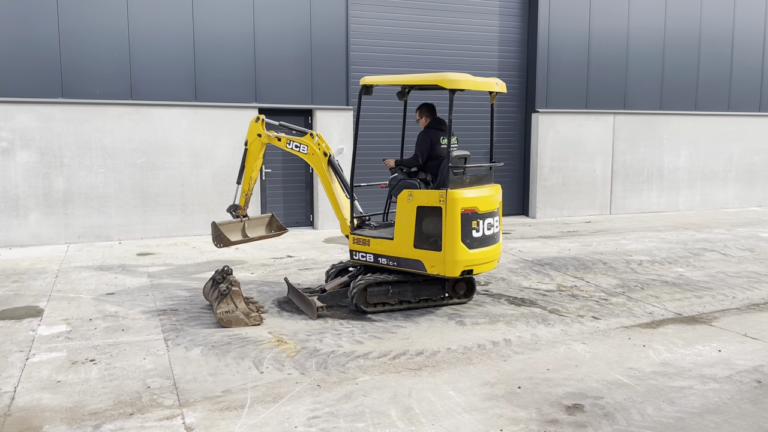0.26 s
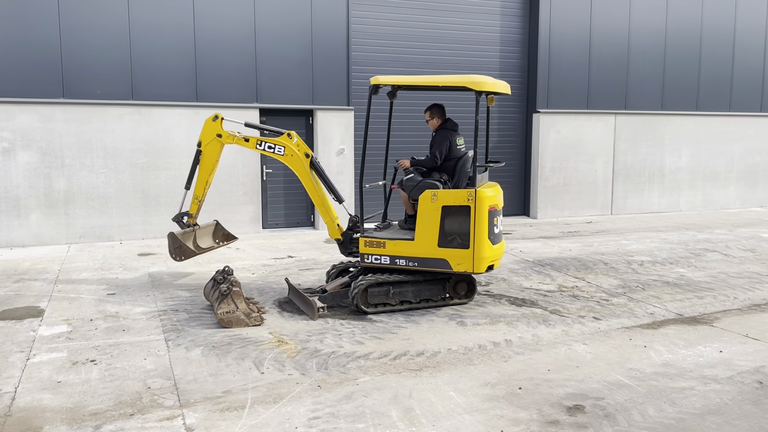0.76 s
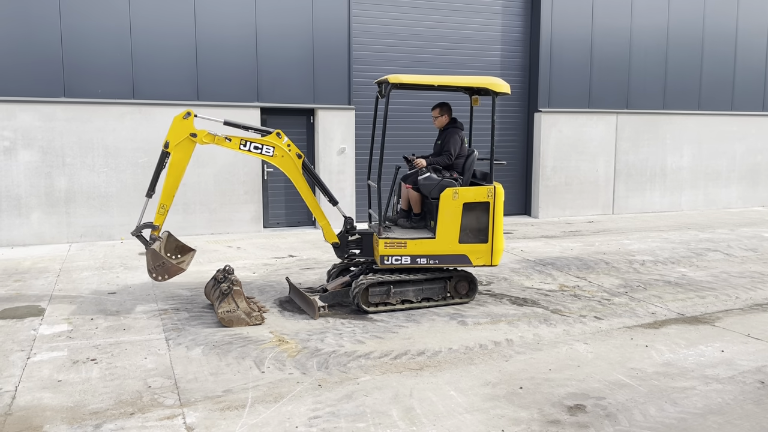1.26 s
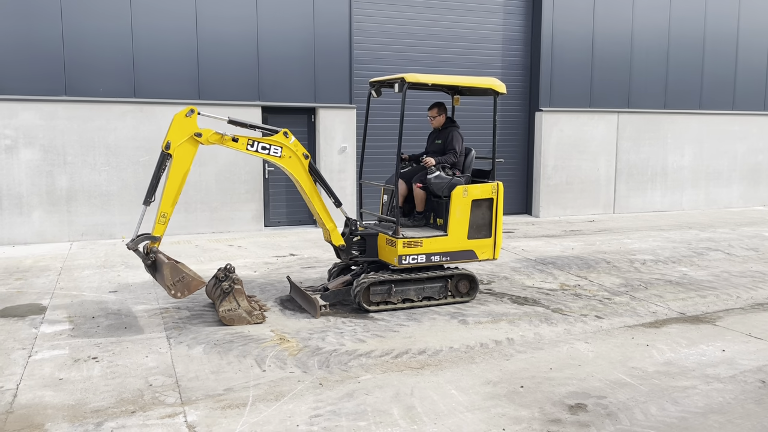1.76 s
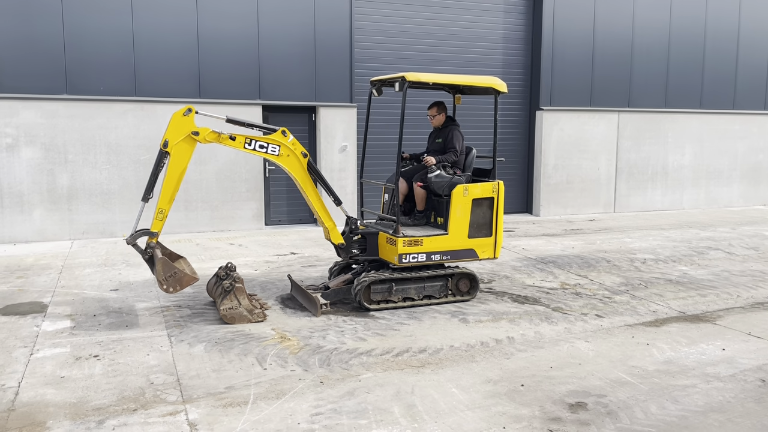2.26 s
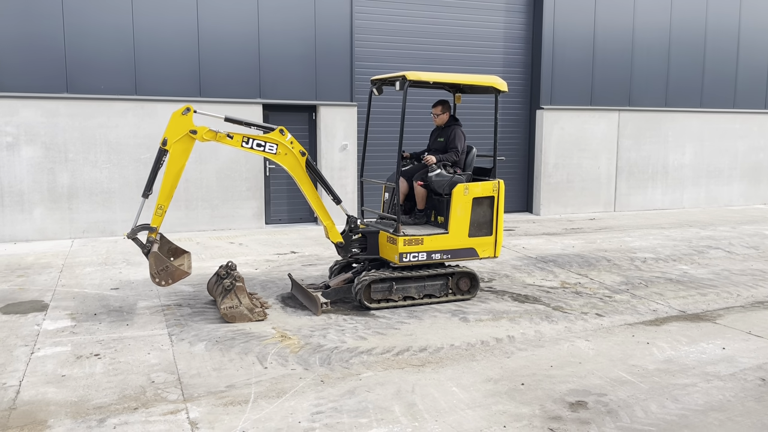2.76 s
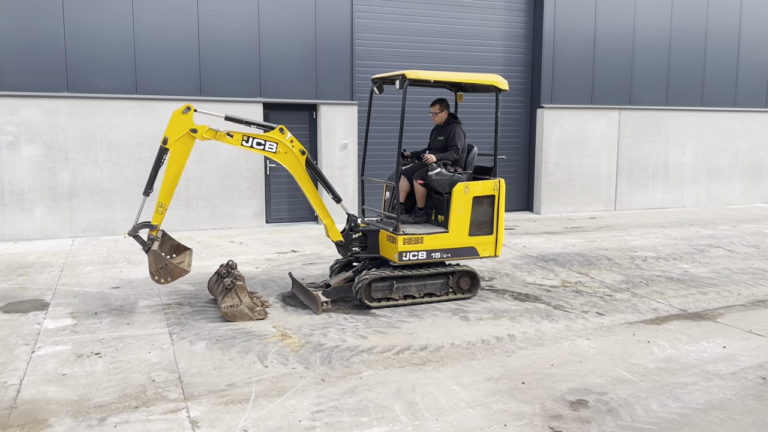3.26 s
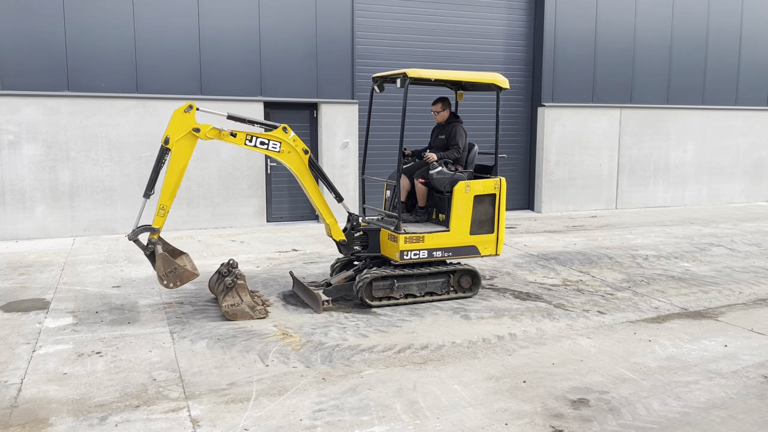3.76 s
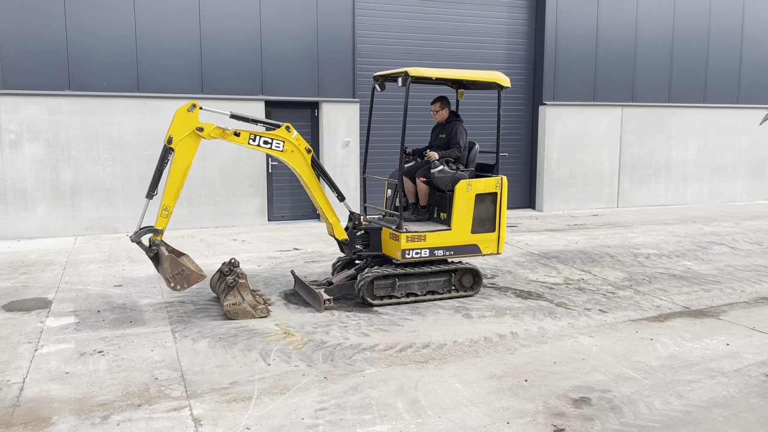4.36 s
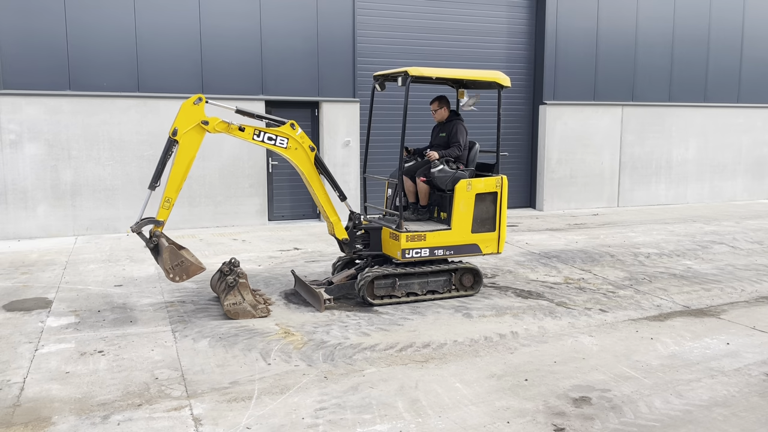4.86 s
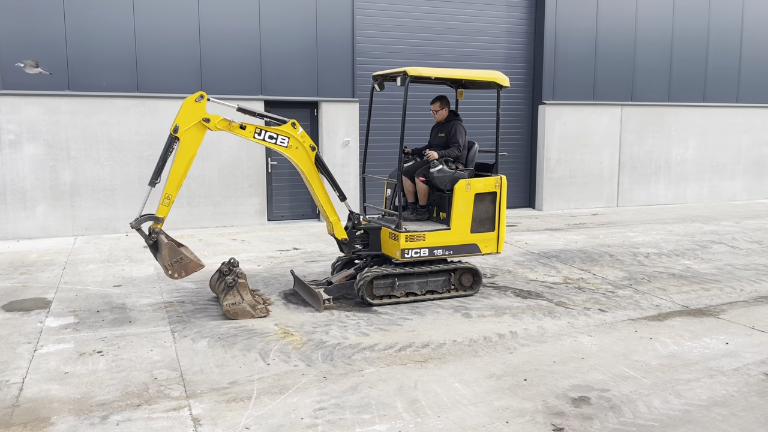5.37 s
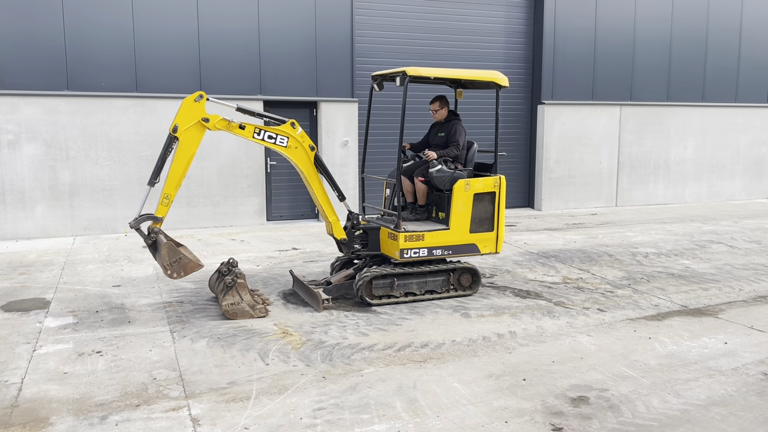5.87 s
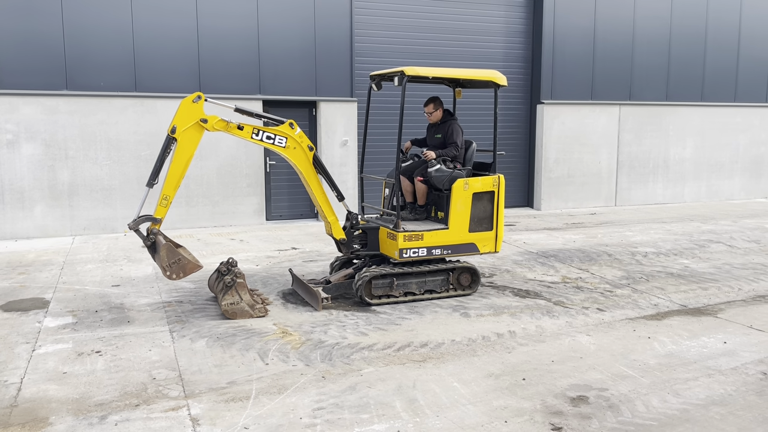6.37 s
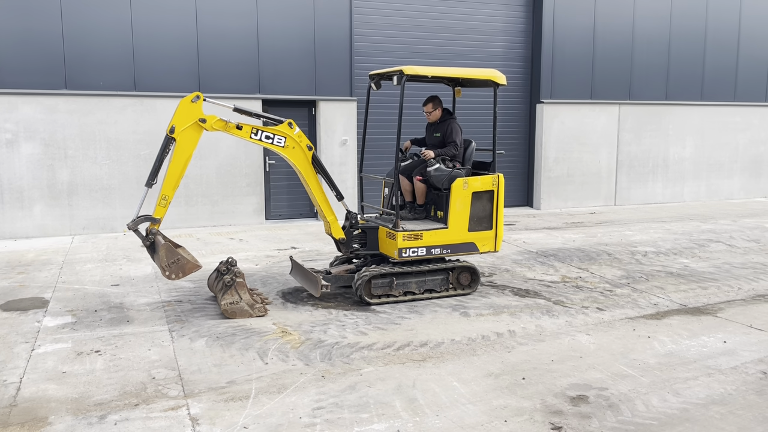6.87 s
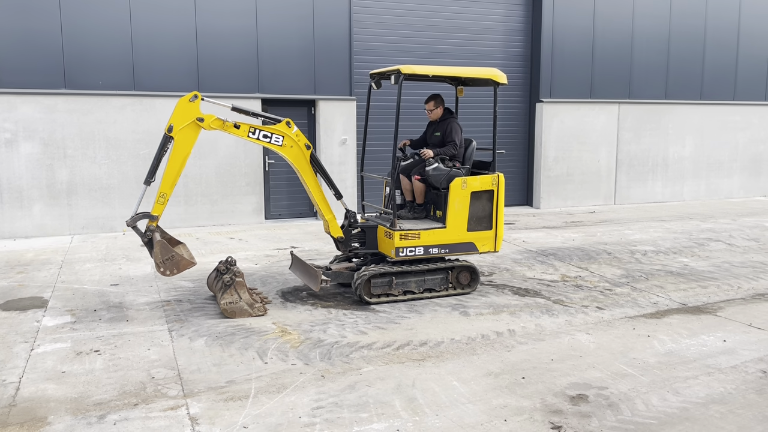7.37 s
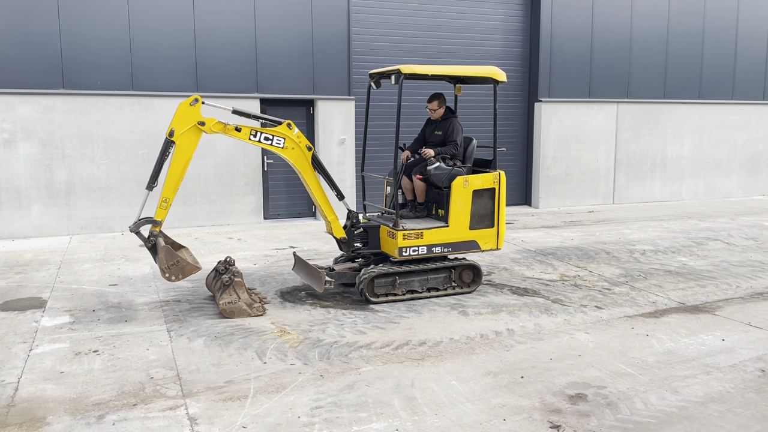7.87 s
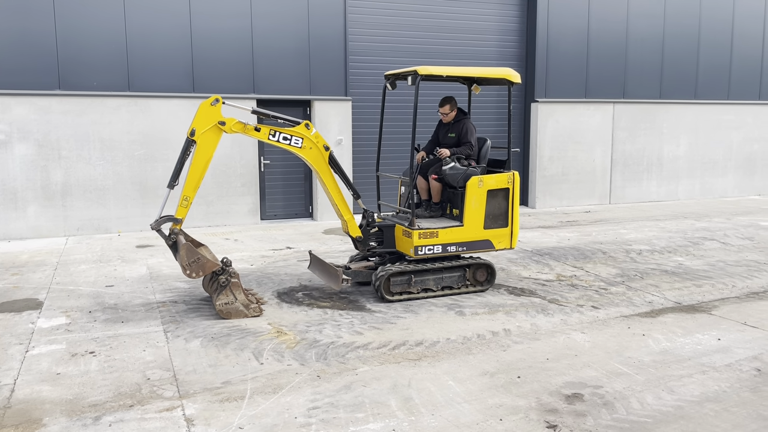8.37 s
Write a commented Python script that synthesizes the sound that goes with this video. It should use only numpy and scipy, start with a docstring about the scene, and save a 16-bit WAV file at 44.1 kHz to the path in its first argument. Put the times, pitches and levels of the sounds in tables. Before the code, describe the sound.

A mini digger runs steadily, dipping under whining hydraulic load, with two sharp clanks and then its blade clattering and scraping over concrete.

```python
"""A concrete yard with a wall behind; two microphone ports a little apart hear a small excavator side-on.
Its three-cylinder diesel booms, knocks and ticks. Each lever movement loads the hydraulic pump: the engine
sags, the pump whines and oil hisses through the valves. Gears grind at first as the cab slews. Pins and
blade clank now and then, echoing off the wall, and at the end the blade scrapes over the concrete."""
import sys
import numpy as np
from scipy import signal
from scipy.fft import rfft, irfft, next_fast_len
from scipy.io import wavfile
from scipy.ndimage import map_coordinates

SR = 44100
rng = np.random.default_rng(int(sys.argv[2]) if len(sys.argv) > 2 else 0)


def put_to_file(sound):
    """Save the sound as 16-bit audio at rate SR, in the file named by the first command-line argument."""
    columns = np.atleast_2d(sound).T  # one column per channel
    safe = np.clip(columns, -1, 1)
    whole_steps = np.round(safe * 32767)
    wavfile.write(sys.argv[1], SR, whole_steps.astype(np.int16))


N = 379701
FREE_HZ = 64.02  # firing rate without load


def amp(db):
    """Gain of a level in dB."""
    return 10 ** (np.asarray(db) / 20)


def unit(x):
    """x at rms 1."""
    return x / np.sqrt(np.mean(x ** 2) + 1e-20)


def along(points, hz):
    """Interpolate (f/Hz, value) points on a log frequency axis."""
    f, v = np.transpose(points)
    return np.interp(np.log(hz + 1), np.log(f + 1), v)


def curves(rows):
    """One value per sample for each column after the time."""
    s, *cols = np.transpose(rows)
    return [np.interp(np.arange(N) / SR, s, c) for c in cols]


def wobble(rate):
    """A smooth random curve, rate knots a second."""
    coarse = np.arange(0, N + 64, 64)
    knots = rng.standard_normal(int(N * rate / SR) + 4)
    return np.interp(np.arange(N), coarse, map_coordinates(knots, [coarse * rate / SR]))


def filtered(x, response):
    """x through a complex frequency response."""
    m = next_fast_len(N + SR // 2)
    return irfft(rfft(x, m) * response(np.fft.rfftfreq(m, 1 / SR)), m)[..., :N]


def humps(modes, hz):
    """Summed bell-shaped resonances."""
    return sum(level / (1 + ((hz - centre) / (width / 2)) ** 2) for centre, width, level in modes)


def peaks(modes, hz):
    """Gain of resonances given in dB."""
    return humps([(centre, width, amp(db)) for centre, width, db in modes], hz)


def exhaust(firings, facing_db, sag_hz):
    """The pipe booms at the firing rate; its overtones waver and change with load and direction."""
    # the boom, its octave without load and its double octave (t/s, level/dB)
    boom = [(0.0, -25), (0.04, -19.5), (0.14, -30), (0.21, -53), (0.26, -39), (0.33, -30.5), (0.76, -19.5),
            (1.2, -29), (1.6, -19), (1.92, -21.5), (2.06, -20.5), (2.18, -26.5), (2.35, -23), (3.43, -19.5),
            (3.88, -26), (4.24, -19), (4.84, -21.5), (5.2, -18), (5.39, -22), (5.66, -16), (5.85, -20),
            (6.14, -16.5), (6.38, -21.5), (6.47, -30), (6.66, -20), (7.31, -21.5), (7.41, -17), (7.79, -20),
            (7.89, -36), (7.94, -26), (8.01, -21), (8.44, -25), (8.56, -21.5), (8.61, -21)]
    octave = [(0, -34), (.07, -17), (.33, -19), (.69, -19.5), (.78, -25), (.88, -40), (1.5, -37.5),
              (2.2, -33), (3.3, -33), (8.61, -33)]
    fourth = [(0, -38), (.12, -29.5), (.5, -32), (1.1, -32.5), (1.3, -35), (2.25, -34.5), (2.42, -30.5),
              (3.0, -33), (3.3, -31), (3.95, -31), (4.1, -36), (4.25, -31.5), (4.75, -32), (4.9, -34.5),
              (6.4, -34), (6.7, -30.5), (8.61, -31)]
    # exhaust and fan lines, one list each: multiple of the firing rate, level/dB,
    # dB per dB of facing, dB per Hz of sag, phase drift/rad
    multiples = [5 / 2, 8 / 3, 3, 10 / 3, 11 / 3, 5, 16 / 3, 6, 19 / 3, 7, 8, 28 / 3, 11, 35 / 3, 37 / 3,
                 13, 41 / 3, 43 / 3]
    levels = [-51, -43, -39, -37.5, -44, -47, -47, -42, -51, -58, -46, -53, -51, -48, -53, -54, -64, -52]
    lifts = [-0.5, -2, -0.15, -1.25, -1.3, 0.23, -2, 1.7, 0, 2, 1.2, -1, -1, -0.2, 0.5, -3, 1.5, -3]
    loads = [3.5, 0, .1, 0.66, 1.5, 3.5, -1, -0.5, -0.3, 2.5, -1.5, -1, 1, -2, -2.5, -2.5, -.2, -4]
    drifts = [.3, .5, .6, .8, .5, .3, .3, .25, .3, .3, .3, .4, .4, .3, .4, .4, .4, .4]
    phase = 2 * np.pi * firings
    octave_db = curves(octave)[0] - 2.5 * sag_hz + 1.2 * wobble(8)
    tones = amp(curves(boom)[0]) * np.sin(phase) + amp(octave_db) * np.sin(2 * phase)
    tones += amp(curves(fourth)[0] - 1.5 + 1.5 * wobble(9)) * np.sin(4 * phase + .5 * wobble(8))
    for k, db, lift, load, drift in zip(multiples, levels, lifts, loads, drifts):
        gain = amp(db + lift * facing_db + load * sag_hz + 2 * wobble(5))
        tones += gain * np.sin(k * phase + drift * wobble(6) + 2 * np.pi * rng.random())
    return np.sqrt(2) * tones


def chug(firings):
    """Every firing sends an uneven puff into the resonances of the silencer."""
    # silencer resonances (f/Hz, width/Hz, level/dB)
    silencer = [(206, 34, 0), (258, 18, -9), (385, 30, -12)]
    # strength of the puffs (t/s, level/dB)
    throb = [(0, -35), (.9, -38), (1.3, -30), (1.45, -27.5), (2.1, -29), (2.9, -32), (3.9, -29),
             (4.05, -24), (4.15, -31.5), (5.3, -26), (5.5, -30.5), (6.3, -30), (7.2, -32), (7.65, -28.5),
             (7.74, -24), (7.85, -30.5), (8.61, -29)]
    at = np.flatnonzero(np.diff(np.floor(firings)))
    puffs = np.zeros(N)
    puffs[at] = np.resize([1.2, .1, -.5], len(at))  # each cylinder's steady push
    puffs[at] += rng.standard_normal(len(at))

    def response(hz):
        ring = sum((-1) ** k * amp(db) * 1j * hz * width / (centre ** 2 - hz ** 2 + 1j * hz * width)
                   for k, (centre, width, db) in enumerate(silencer))
        return ring ** 2 / (1 + (150 / (hz + 1)) ** 6)
    return amp(curves(throb)[0] - 2.5) * unit(filtered(puffs, response))


def block(firings, facing_db):
    """Engine noise through the covers; above the bass it knocks, one cylinder harder than the others."""
    # spectrum of block and fan (f/Hz, level/dB)
    spectrum = [(25, -33), (42, -8.5), (80, -6.5), (110, -5), (200, -4), (440, -13.5), (700, -15.5),
                (1040, -16), (1480, -24), (2400, -28), (4000, -31), (6000, -35.5), (8000, -29),
                (10000, -42.5), (15500, -64)]
    # cover resonances (f/Hz, width/Hz, boost/dB)
    panels = [(164, 19, 0), (228, 30, -2), (649, 95, 6.5), (930, 70, 1), (1970, 120, 4), (2270, 17, 8.5),
              (4480, 1040, 3.5)]
    colour = lambda hz: amp(along(spectrum, hz) + humps(panels, hz))
    stroke = np.floor(firings).astype(int)
    force = amp(np.array([.8, 1.5, -1.5])[stroke % 3] + 1.54 * rng.standard_normal(stroke[-1] + 1)[stroke])
    knocks = unit(force * (2 + np.exp(-(firings % 1) / .11)))
    knock_share = lambda hz: .5 / (1 + (1300 / (hz + 1)) ** 2)
    smooth, rough = rng.standard_normal((2, 2, N))
    noise = filtered(smooth, lambda hz: colour(hz) * np.sqrt(1 - knock_share(hz)))
    noise *= amp(-.3 * facing_db)  # the fan grille turns away as the pipe turns towards us
    noise += filtered(rough * knocks, lambda hz: colour(hz) * np.sqrt(knock_share(hz)))
    return amp(-28 + .32 * facing_db) * unit(noise)


def tappet(firings, facing_db, ring_width_hz=65):
    """One valve ticks once in every engine cycle of three firings and keeps the covers ringing."""
    # valve gear resonances (f/Hz, width/Hz, level/dB)
    modes = [(1715, 81, -2.5), (2044, 230, -0.5), (2730, 165, -4.5), (4300, 230, -5)]
    # two cover rings that shift as the machine works (t/s, low f/Hz, level/dB, high f/Hz, level/dB)
    rings = [(0, 1730, -60, 2024, -49), (1.1, 1746, -55, 2004, -49), (1.4, 1755, -46, 2010, -47),
             (1.5, 1750, -55, 2000, -64), (1.55, 1750, -54, 2140, -66), (1.65, 1750, -60, 2146, -49),
             (2.3, 1735, -48, 2130, -48), (2.8, 1770, -65, 2160, -50), (3.3, 1760, -58, 2153, -53),
             (3.45, 1773, -50, 2126, -54), (4.1, 1750, -49, 2155, -52), (4.4, 1740, -55, 2160, -52),
             (5.1, 1734, -49, 2167, -46.5), (5.4, 1712, -51, 2130, -53), (6.3, 1710, -48.5, 2142, -49),
             (6.6, 1750, -53, 2145, -60), (8.61, 1720, -54, 2116, -60)]
    cycles = firings / 3 - .33
    force = amp(1.5 * rng.standard_normal(int(cycles[-1]) + 2))[np.floor(cycles).astype(int) + 1]
    beat = unit(force * (.23 + np.exp(-(cycles % 1) / .44)))
    ticks = unit(filtered(beat * rng.standard_normal((2, N)), lambda hz: peaks(modes, hz)))
    ticks *= amp(-47.5 + .5 * facing_db)
    low_hz, low_db, high_hz, high_db = curves(rings)
    for hz, db in ((low_hz, low_db), (high_hz, high_db)):
        swing = wobble(ring_width_hz) + 1j * wobble(ring_width_hz)
        ring = (swing * np.exp(2j * np.pi * np.cumsum(hz) / SR)).real
        ticks[0] += amp(db) * unit((beat + 1.3) * ring)
    return ticks


def levers(open_s=.134, close_s=.07, governor_hz=4.2, damping=.55):
    """A lever opens a valve and the governor lets the engine sag: firing rate in Hz, oil flow in dB."""
    # lever movements (start t/s, end t/s, flow over idle/dB, sag/Hz, further sag/Hz per s)
    movements = [(-.2, 0.584, 6, 3.1, 0), (0.585, 1.5, 7.5, 1.5, 0), (1.978, 2.979, 8.5, 2.0, .75),
                 (3.185, 4.083, 3.5, 1.0, -.1), (4.57, 5.149, 6.5, 1.85, 0), (6.32, 7.139, 8.5, 2.25, 0),
                 (7.749, 8.169, 8, 1.9, 0), (8.281, 8.8, 7, 2.0, 0)]
    t = np.arange(N) / SR
    start, end, rise_db, sag_hz, creep = np.transpose(movements)[:, :, None]
    opened = np.clip(.5 + (t - start) / open_s, 0, 1) * np.clip(.5 + (end - t) / close_s, 0, 1)
    load = (opened * (sag_hz + creep * (t - start))).sum(axis=0)
    governor = lambda hz: 1 / (1 - (hz / governor_hz) ** 2 + 2j * damping * hz / governor_hz)
    sag = load[0] + filtered(load - load[0], governor)
    return FREE_HZ - sag + .1 * wobble(4), -6.5 + (opened * rise_db).sum(axis=0)


def pump_whine(firings, flow_db, facing_db, pressure_hz=2.5):
    """The pump's lines rise with the oil flow and fall back with the lagging pressure."""
    # pump lines, one list each: multiple of the firing rate, level/dB,
    # dB per dB of flow, share of the shade, dB per dB of facing
    multiples = [9, 31 / 3, 16]
    levels = [-41, -45, -40.5]
    growths = [0.86, 0.43, 0.77]
    shares = [0.16, .15, .95]
    lifts = [-.6, -0.71, 0.22]
    # the turning body hides the pump from the microphone for a while (t/s, level/dB)
    shade = [(0, -3), (.45, 1.5), (.6, -20), (.95, -5), (1.05, -9), (1.5, -3.5), (1.9, -1), (3.1, -2.5),
             (3.4, -0.5), (4.1, 1), (4.5, 0), (7.7, -1), (7.9, 2.5), (8.61, -2)]
    pressure_db = flow_db[0] + filtered(flow_db - flow_db[0], lambda hz: 1 / (1 + 1j * hz / pressure_hz))
    drive_db = np.maximum(flow_db, pressure_db)
    tones = np.zeros(N)
    for k, db, growth, share, lift in zip(multiples, levels, growths, shares, lifts):
        gain = amp(db + growth * drive_db + share * curves(shade)[0] + lift * facing_db + wobble(5.5))
        tones += gain * np.sin(2 * np.pi * k * firings + .2 * wobble(12))
    return np.sqrt(2) * tones


def pressure_ripple(firings, flow_db):
    """The ripple repeats with each firing, so it sings in close lines in the pump and valve body."""
    # their resonances at idle and under load (f/Hz, width/Hz, level/dB)
    idle_modes = [(8220, 240, 0), (7750, 150, -13), (10350, 200, -17)]
    loaded_modes = [(7500, 80, -6), (7980, 190, 0), (8550, 150, -6), (9130, 110, -11), (10130, 150, -17),
                    (10520, 100, -17), (10870, 220, -17), (11430, 150, -18), (12570, 130, -17),
                    (13400, 600, -20), (14800, 200, -14), (15480, 300, -12)]
    shape = irfft(np.exp(2j * np.pi * rng.random(260)) * amp(rng.normal(0, 3, 260)), 8192)
    ripple = np.interp((firings + .003 * wobble(20)) % 1, np.linspace(0, 1, len(shape)), shape)
    sings = lambda modes: unit(filtered(ripple, lambda hz: peaks(modes, hz)))
    idle_db = -51.5 + 1.5 * wobble(8)
    loaded_db = -45 + 1.1 * flow_db - 8 * (flow_db < -3) + 2.2 * wobble(8)
    return amp(idle_db) * sings(idle_modes) + amp(loaded_db) * sings(loaded_modes)


def valve_hiss(flow_db, bright_hz=11200):
    """Oil hisses through the valves, louder and brighter as the flow grows."""
    # spectrum of the hiss (f/Hz, level/dB)
    spectrum = [(4000, -30), (6500, -6), (8200, 0), (9500, -2), (10800, -2), (12000, -5), (13000, -3),
                (14200, -3), (15500, 1)]
    hiss = unit(filtered(rng.standard_normal((2, N)), lambda hz: amp(along(spectrum, hz))))
    treble = filtered(hiss, lambda hz: 1 / (1 + (bright_hz / (hz + 1)) ** 20))
    hiss += (amp(.42 * np.minimum(flow_db, 0)) - 1) * treble
    return amp(-43.5 + flow_db + wobble(15)) * hiss


def clanks(crack_s=.0007):
    """Pins and blade crack, rattle and ring the steel near the pitches that the struck spot favours."""
    # contacts (t/s, level/dB, low f/Hz, high f/Hz, high ring/dB, rattle/dB, left over right/dB,
    # rise of the low ring/s)
    contacts = [(.103, -37, 966, 4140, 12, -9, 0, .003), (1.611, -14, 822, 4600, -6, -14, 7, 0.0047),
                (4.139, -12, 668, 2170, -19, -20, 6, 0.00078), (7.774, -25, 1150, 2102, -8, -16, 0, .002),
                (7.813, -19.5, 1140, 2090, -10, -17, 0, 0.0031),
                (7.903, -21, 575.3, 2100, -3, -11, .5, 0.0023), (7.918, -24, 575, 2100, 0, -15, 1, .002),
                (7.981, -25, 781, 5860, 2, -11, 8, .003), (8.001, -12.5, 688, 1330, -12, -14, 2, 0.0017),
                (8.039, -23, 1123, 1994, -13, -18, 0, 0.0028),
                (8.1072, -7.5, 620, 1320, -12, -19, 4, .0004), (8.1112, -9, 900, 1400, -4, -16, 4, .0006),
                (8.133, -19, 578, 990, -5, -20, 2, .001), (8.2, -21.5, 1088, 3400, -11, -13, 9, 0.0029),
                (8.258, -12, 581, 1980, -15, -26, -1, 0.0052), (8.2905, -14, 1155, 2080, -1, -16, -2, .001),
                (8.328, -19, 680, 3780, -7, -11, 9, 0.004), (8.364, -18, 640, 3250, -18, -14, 2, .003),
                (8.459, -21, 996, 2010, -14, -20, -1, .003), (8.562, -12, 815, 2600, -7, -11, 7, 0.005)]
    # modes of the steel (f/Hz, level/dB, t60/s)
    steel = [(579, 2, 0.094), (658, -3, .08), (825, 5.5, 0.047), (986, -5.5, 0.13), (1135, 3.5, 0.055),
             (1312, 2, 0.082), (1770, 11, 0.05), (2090, 1.5, 0.044), (2595, 0.5, 0.048), (2920, 0, 0.064),
             (3280, 11, 0.055), (3770, 6, 0.043), (4150, 2.5, 0.057), (4505, 1, 0.074), (5400, 10, 0.029),
             (5900, 1, 0.032)]
    out, t = np.zeros((2, N + SR)), np.arange(SR // 8) / SR
    rattle_band = signal.butter(4, [900, 6300], "band", fs=SR, output="sos")
    for s, db, low_hz, high_hz, high_db, rattle_db, pan_db, rise_s in contacts:
        ring = np.zeros(len(t))
        for hz, level, t60 in steel:
            favour_db = max(-28 * abs(np.log2(hz / low_hz)), high_db - 85 * abs(np.log2(hz / high_hz)))
            rise = 1 - np.exp(-(t / (rise_s if hz < 1000 else crack_s)) ** 2)
            decay = amp(level + favour_db + rng.normal(0, 1.5) - 60 * t / t60)
            ring += decay * rise * np.sin(2 * np.pi * hz * rng.normal(1, .0064) * t)
        rattle = signal.sosfilt(rattle_band, rng.standard_normal(len(t)))
        rattle += 4 * signal.lfilter([.25], [1, -.75], rattle)  # more weight below 2 kHz
        rattle *= amp(rattle_db - 60 * t / .11) * (1 - np.exp(-t / crack_s))
        gains = amp(db - 7 + pan_db * np.array([[.5], [-.5]]))
        out[:, round(s * SR):][:, :len(t)] += gains * (ring + rattle)
    return out[:, :N]


def blade_scrape():
    """The blade drags over the concrete in gritty bursts."""
    # spectrum of the blade (f/Hz, level/dB)
    spectrum = [(200, -18), (330, 1), (580, 3.5), (1000, 0.5), (1800, -7), (2600, -12.5), (4500, -25),
                (6500, -35), (9000, -50)]
    # course of the drag (t/s, level/dB)
    drag = [(0, -70), (7.72, -70), (7.82, -30.5), (7.95, -29.5), (8.05, -30.5), (8.17, -33.5), (8.23, -34),
            (8.35, -28.5), (8.45, -32.5), (8.61, -32.5)]
    grit = rng.standard_normal((2, N)) * amp(2.6 * wobble(45))
    return amp(curves(drag)[0]) * unit(filtered(grit, lambda hz: amp(along(spectrum, hz))))


def slewing_gear(firings):
    """The gear that turns the cab grinds in a few resonances while its motor hums."""
    # gear and linkage resonances (f/Hz, width/Hz, level/dB)
    modes = [(407, 200, -1), (577, 170, 10.5), (845, 160, -3), (1110, 170, -12), (1580, 110, -1),
             (2050, 330, -15), (2740, 340, -5), (3940, 700, -18), (4680, 300, -14), (5600, 300, -11)]
    # course of the slewing (t/s, level/dB)
    slew = [(0, -39.5), (.45, -35.5), (.65, -34), (.95, -35), (1.3, -34.5), (1.55, -55), (8.61, -58)]
    # motor hum, one list each: multiple of the firing rate, relative level/dB
    multiples = [28 / 3, 10, 12, 38 / 3, 13, 40 / 3]
    levels = [-6.5, -13, -26, -15, -10, -18]
    grind = filtered(rng.standard_normal((2, N)) * amp(2.8 * wobble(30.3)), lambda hz: peaks(modes, hz))
    hum = sum(amp(db + 1 + 2.5 * wobble(5.2)) * np.sin(2 * np.pi * k * firings + .5 * wobble(8))
              for k, db in zip(multiples, levels))
    return amp(curves(slew)[0]) * (unit(grind) + hum * [[1], [0]])


def wall(x, t60=.44, delay_s=.008):
    """A short dull echo from the wall and the concrete."""
    t = np.arange(SR // 4) / SR
    tail = signal.lfilter([1], [1, -.6], rng.standard_normal((2, len(t))))
    tail *= amp(-60 * t / t60) * (t > delay_s)
    return signal.fftconvolve(x, tail / np.linalg.norm(tail[0]), axes=1)[:, :N]


def ports(direct, scattered):
    """The direct sound reaches one port first; what the yard scatters arrives in opposition."""
    # phase by which the left port leads (f/Hz, phase/rad)
    left_lead = [(0, 0), (1200, -.1), (1500, -.5), (2200, .35), (5200, -.1), (6500, -.8), (7800, -3),
                 (8800, -3.2), (9800, -4.9), (10900, -6.2), (12300, -6.3), (13000, -7.7), (14100, -9.3),
                 (15900, -9.5)]
    # how alike the two ports sound (f/Hz, likeness 0-1)
    likeness = [(60, 0.97), (300, 0.93), (700, 0.94), (1400, 0.84), (2800, 0.88), (5000, 0.94),
                (8000, 0.99), (10000, 0.98), (12500, 0.99), (14000, 1)]

    def response(hz):
        turn = np.arccos(np.clip(along(likeness, hz), 0, 1)) / 2
        lead = np.exp(.5j * along(left_lead, hz))
        return np.array([[np.cos(turn) * lead, np.sin(turn) * lead],
                         [np.cos(turn) / lead, -np.sin(turn) / lead]])
    return filtered(np.array([direct, scattered])[None], response).sum(axis=1)


def scene():
    """The working machine at the two ports, with the wall's echo on the clanks."""
    # how squarely the tail pipe faces the microphone as the cab slews (t/s, level/dB)
    facing = [(0, 6), (.65, 2.5), (.95, 2), (1.4, 0), (8.61, -1.5)]
    facing_db = curves(facing)[0]
    firing_hz, flow_db = levers()
    firings = np.cumsum(firing_hz) / SR
    pump = pump_whine(firings, flow_db, facing_db) + pressure_ripple(firings, flow_db)
    # the noises have two rows: direct and scattered
    noise = valve_hiss(flow_db) + block(firings, facing_db) + tappet(firings, facing_db)
    noise += slewing_gear(firings) + blade_scrape()
    metal = clanks()
    pipe = exhaust(firings, facing_db, FREE_HZ - firing_hz) + chug(firings)
    return ports(pipe + pump + noise[0], noise[1]) + metal + amp(-10.5) * wall(metal)


def record(dry, top_hz=15780):
    """Nothing is kept above the band limit."""
    return filtered(dry, lambda hz: hz < top_hz)


dry = scene()
out = record(dry)
put_to_file(out)
```